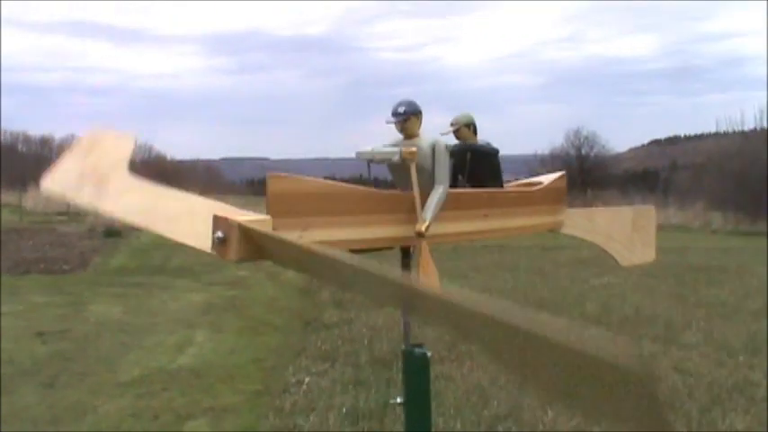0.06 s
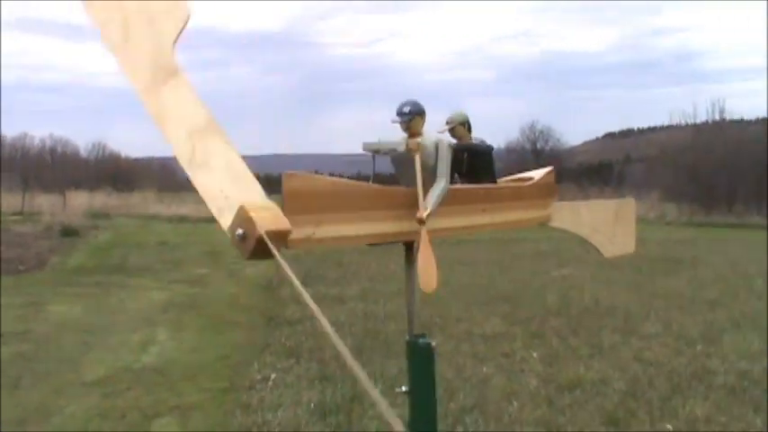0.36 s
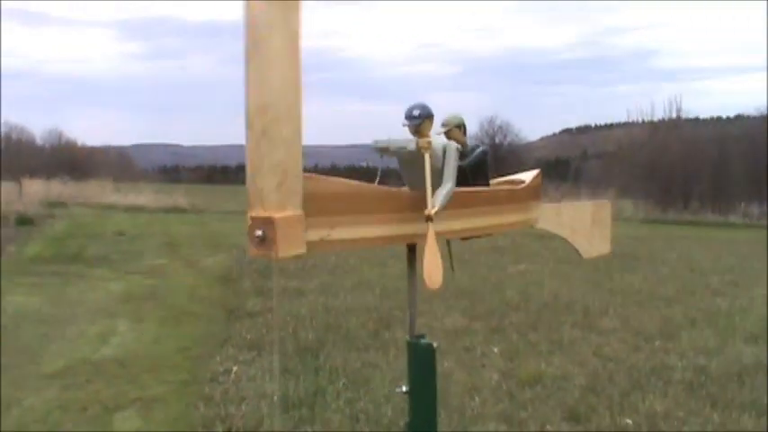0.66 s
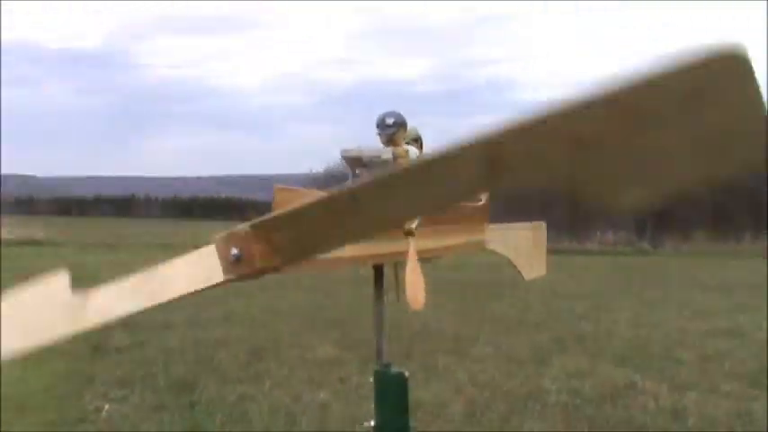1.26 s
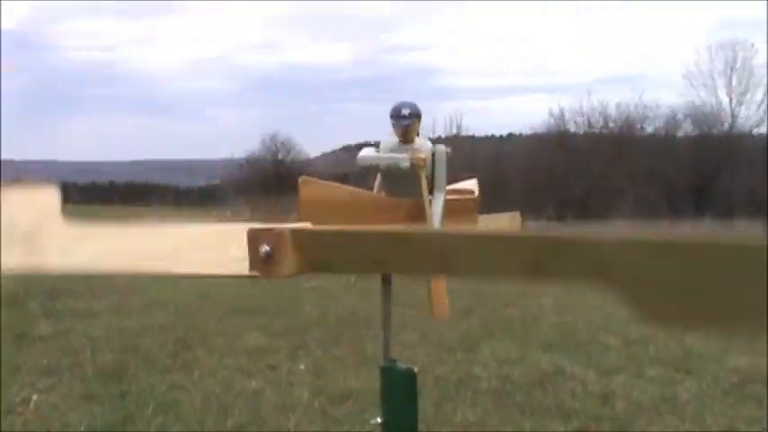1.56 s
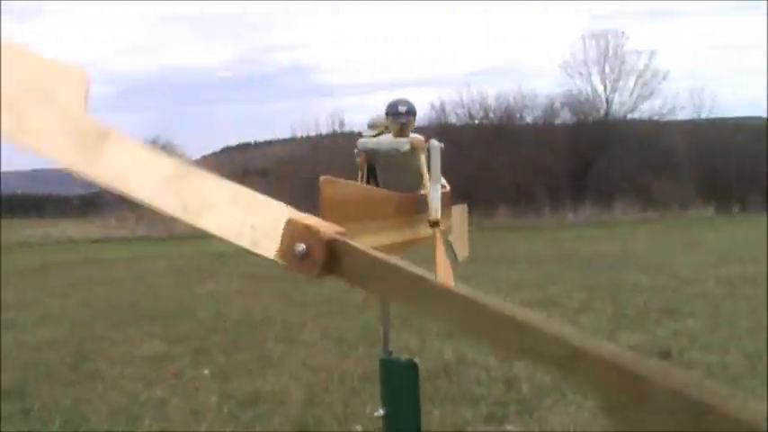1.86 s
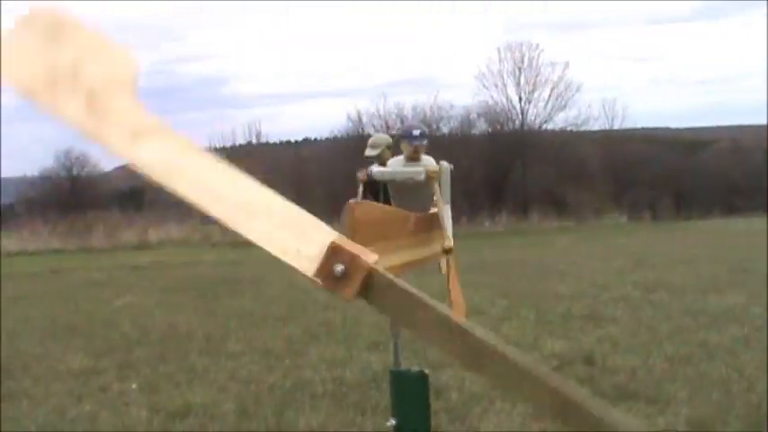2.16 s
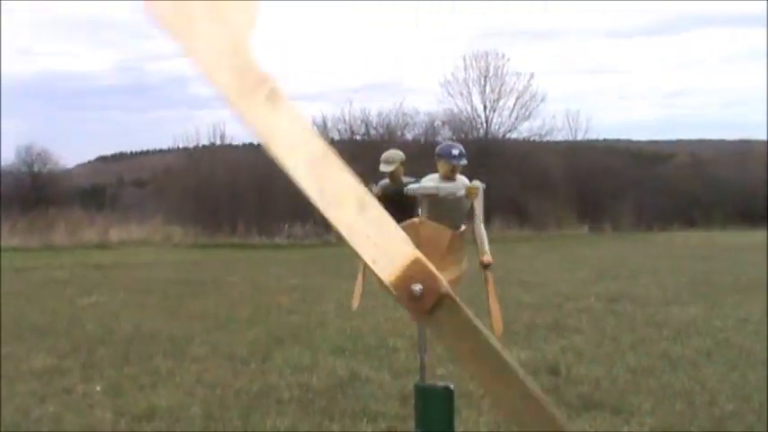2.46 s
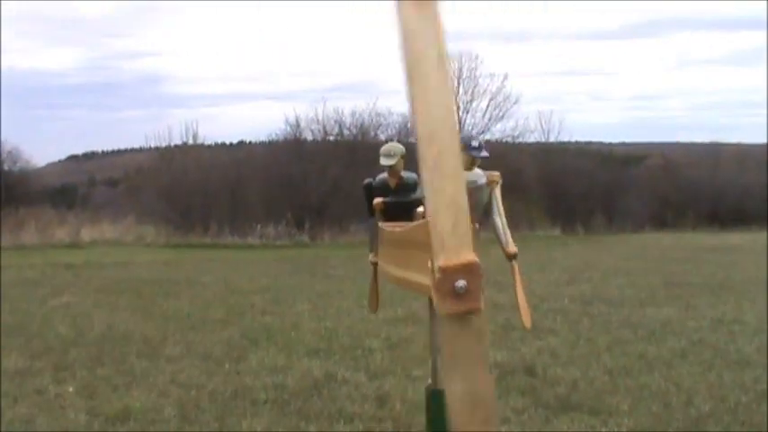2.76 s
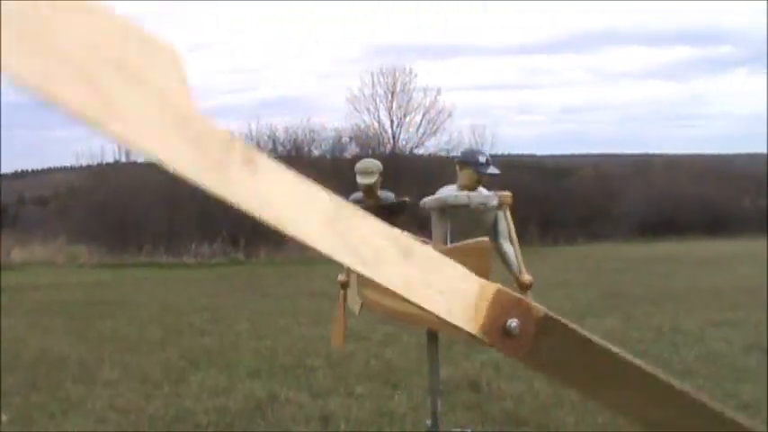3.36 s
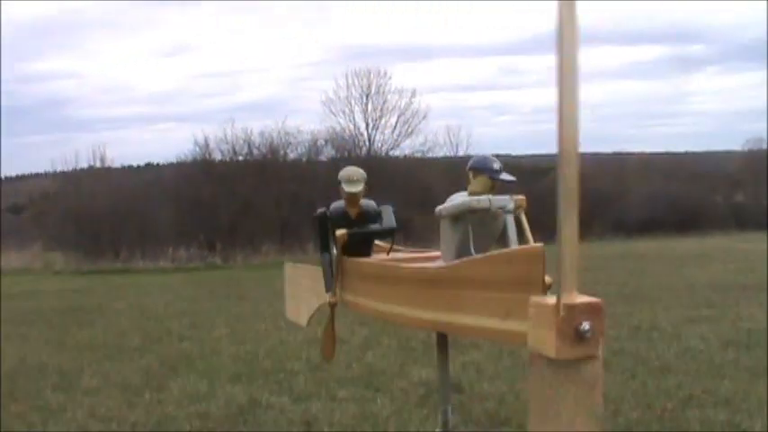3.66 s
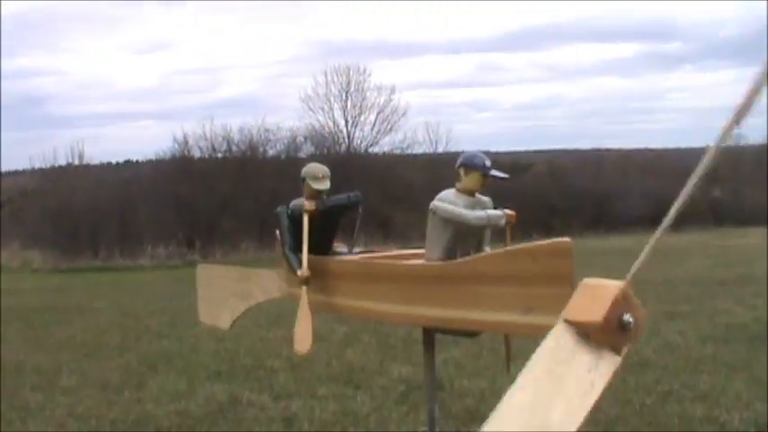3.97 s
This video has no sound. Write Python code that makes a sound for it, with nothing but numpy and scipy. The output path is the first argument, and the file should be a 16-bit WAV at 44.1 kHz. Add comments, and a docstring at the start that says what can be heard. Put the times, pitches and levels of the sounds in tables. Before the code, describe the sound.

Uneven wind gusts rumble on the microphone while a wooden whirligig faintly clatters and creaks.

```python
"""Uneven wind gusts buffet a camera microphone in an open field and die down after two seconds.
Their eddies rumble and flutter at its two ports; a few slaps of air thump.
Close by, a wooden whirligig turns: its crank sticks and slips once a turn, its dry joints click and
squeal, its loose linkage chatters and knocks on the hull. One sharp tick stands out from two faint ones.
Behind: a brief thin whistle, passing grass hiss, a low hum and quiet field air."""
import sys
import numpy as np
from scipy import signal
from scipy.fft import rfft, irfft, next_fast_len
from scipy.io import wavfile
from scipy.ndimage import map_coordinates

SR = 44100
rng = np.random.default_rng(int(sys.argv[2]) if len(sys.argv) > 2 else 0)


def wav_out(sig):
    """Save sig, one row per channel (or a flat mono array), as 16-bit PCM at SR to the path in sys.argv[1]."""
    wavfile.write(sys.argv[1], SR, np.round(np.clip(np.atleast_2d(sig).T, -1, 1) * 32767).astype(np.int16))


N = 176400

# gust envelope, before trim: time_s, rumble_db, flutter_db
GUSTS = [(0.0, -35.5, -53), (0.06, -56, -52), (0.11, -45, -44), (0.13, -40, -52), (0.24, -49, -58),
         (0.26, -39, -49), (0.32, -43.5, -48.5), (0.39, -55, -62.5), (0.47, -52, -41.5), (0.5, -48.5, -49),
         (0.58, -42, -49), (0.6, -42.5, -45.5), (0.66, -37, -46), (0.72, -49.5, -49.5), (0.81, -60.5, -66),
         (0.85, -40, -51.5), (0.87, -53, -55.5), (0.89, -60.5, -62), (0.93, -42.5, -58.5),
         (0.96, -53.5, -72), (0.99, -48.5, -57), (1.01, -53.5, -59), (1.03, -39, -51), (1.1, -51, -46.5),
         (1.12, -47, -42.5), (1.15, -55, -54.5), (1.16, -44, -44.5), (1.25, -45, -57), (1.27, -53, -64),
         (1.34, -50, -54.5), (1.36, -60, -63), (1.38, -44, -55), (1.41, -66, -63.5), (1.45, -46.5, -43.5),
         (1.58, -62, -76.5), (1.63, -49, -66), (1.65, -52, -51.5), (1.745, -39.5, -50), (1.82, -46, -55.5),
         (1.91, -44.5, -49.5), (1.95, -49.5, -56), (1.97, -39, -48.5), (2.0, -51, -73), (2.03, -46, -51.5),
         (2.11, -51.5, -66), (2.14, -43, -59), (2.2, -50.5, -62), (2.28, -56, -70.5), (2.35, -91, -96),
         (2.42, -70, -86), (2.67, -76, -86), (2.85, -61, -75), (2.92, -59, -75)]
# closing lull, before trim: time_s, rumble_db, flutter_db
LULL = [(3.0, -53, -58.5), (3.06, -57, -70.5), (3.12, -69, -81), (3.32, -68, -89), (3.358, -59.5, -78),
        (3.48, -67.5, -80.5), (3.68, -62.5, -75), (3.73, -73, -87), (4.0, -70, -86)]
# big-eddy spectrum: freq_hz, gain_db
RUMBLE_SPECTRUM = [(20, 0.5), (50, 0.5), (100, 1.5), (160, -4.5), (300, -29.5), (600, -46.5), (1500, -62),
                   (4000, -100)]
# small-eddy spectrum: freq_hz, gain_db
FLUTTER_SPECTRUM = [(40, -27), (120, -5), (210, -1.5), (400, -12), (700, -22.5), (1300, -32.5),
                    (3000, -51.5), (9000, -107)]
# flutter side-channel EQ: freq_hz, gain_db
FLUTTER_SIDE_EQ = [(100, 2.5), (200, 1), (400, 3.5), (800, 4), (1500, 4)]
# air slaps: start_s, level_db
THUMPS = [(1.794, -37.5), (2.138, -43), (2.962, -37), (2.976, -45), (3.032, -46.5)]
# modes of a slap: freq_hz, gain_db, t60_s
THUMP_MODES = [(153, 0, 0.063), (214, -11.5, 0.12), (303, 3.5, 0.029), (440, -18, 0.038),
               (830, -35, 0.0065)]

# crank rubs, one a turn: start_s, end_s, level_db, pitch_ratio, crest_fraction, treble_db
RUBS = [(0.47, 0.77, -59, 1.01, 0.35, -2.5), (1.246, 1.485, -59.5, 1.02, 0.57, 3.5),
        (1.969, 2.15, -60, 1.02, 0.33, 2), (2.571, 2.831, -62, 1.0, 0.54, 5.5),
        (3.457, 3.76, -63.5, 1, 0.62, 2.5)]
# crank catches: start_s, level_db
CATCHES = [(0.444, -53), (0.576, -55), (0.705, -57), (1.221, -61.5), (1.288, -58), (1.369, -59),
           (2.037, -57), (2.12, -58), (2.553, -62), (2.623, -58), (2.666, -57), (2.704, -52.5),
           (2.733, -61), (2.796, -62.5), (3.412, -56.5), (3.508, -59), (3.558, -66), (3.61, -57.5)]
# lower crank resonances: centre_hz, width_hz, gain_db
CRANK_BANDS = [(1647, 240, -3), (2170, 340, -6), (2433, 190, 4.5), (2706, 290, -2.5), (3240, 610, -18.5)]
# upper, rasping crank resonances: centre_hz, width_hz, gain_db
RASP_BANDS = [(3370, 1200, -2.5), (4414, 410, 3), (5174, 220, 1), (7580, 4000, -18.5)]
# linkage chatter: start_s, end_s, level_db
CHATTERS = [(0.04, 0.27, -62.5), (0.29, 0.33, -65), (0.45, 0.72, -72), (0.76, 1.0, -65.5),
            (1.53, 1.72, -65.5), (2.2, 2.38, -68.5), (2.85, 2.96, -66), (3.0, 3.07, -70.5),
            (3.87, 4.0, -66.5)]
# linkage knocks: start_s, level_db
KNOCKS = [(0.057, -51), (0.093, -65), (0.146, -51.5), (0.165, -49.5), (0.209, -47), (0.23, -46),
          (0.241, -49), (0.313, -52.5), (1.542, -58.5), (1.712, -55), (1.902, -55.5), (2.296, -57),
          (2.322, -56), (2.342, -58), (2.905, -58), (2.962, -66), (2.993, -58), (3.862, -54), (3.959, -57)]
# wooden hull resonances: centre_hz, width_hz, gain_db
HULL_BANDS = [(970, 980, 0), (1700, 108, 11), (2187, 390, 0), (2500, 390, -1), (2750, 250, -11),
              (4110, 950, -8.5), (5150, 300, -9), (6340, 500, -16.5), (7790, 610, -18), (9500, 2300, -22.5)]
# joint clicks, and two lower crank catches near 0.23 s played the same way: start_s, pitch_hz, level_db
CLICKS = [(0.166, 5370, -59), (0.229, 5300, -53), (0.233, 2230, -51), (0.241, 2200, -49),
          (1.542, 5550, -68), (1.626, 5270, -74), (1.648, 5550, -67), (1.671, 5400, -63.5),
          (1.71, 5260, -76), (1.753, 5200, -69.5), (1.966, 4150, -59), (2.34, 5360, -70),
          (2.866, 4200, -59), (2.903, 4300, -61)]
# joint squeals: start_s, end_s, pitch_hz, level_db
SQUEALS = [(0.778, 0.873, 4060, -71), (1.938, 1.973, 4400, -73), (2.857, 2.945, 4250, -77),
           (3.878, 3.953, 7930, -81)]
# soft frame rings: start_s, level_db
FRAME_RINGS = [(2.31, -70), (3.871, -62.5)]
# frame modes: freq_hz, gain_db, t60_s
FRAME_MODES = [(593, -1.5, 0.42), (890, -2, 1), (1101, -7, 0.34), (1430, -9, 0.37)]

# sharp ticks: start_s, level_db
TICKS = [(0.146, -52.5), (0.9672, -34.5), (3.658, -58)]
# modes of a tick: freq_hz, gain_db, t60_s
TICK_MODES = [(4980, -6.5, 0.0055), (7100, -4.5, 0.0057), (8450, 1.5, 0.0015)]
# grass hiss envelope: time_s, level_db
GRASS_LEVEL = [(0.0, -77.5), (0.22, -75), (0.28, -81.5), (0.45, -76), (0.55, -79), (0.61, -73), (0.76, -71),
               (1.07, -69.5), (1.13, -83), (1.9, -86), (2.02, -75.5), (2.33, -79), (2.41, -82.5),
               (4.0, -85)]
# grass hiss spectrum: freq_hz, gain_db
GRASS_SPECTRUM = [(800, -2), (2500, 12), (4200, 7), (5800, 4.5), (7200, 9.5), (10000, 4), (13000, 0),
                  (16000, -4.5)]
# low drone spectrum: freq_hz, gain_db
DRONE_SPECTRUM = [(20, 9.5), (60, 1.5), (100, -8), (125, 3.5), (160, -6), (260, -30.5), (600, -62)]
# field air spectrum: freq_hz, gain_db
AIR_SPECTRUM = [(110, -13), (180, 1.5), (298, -8), (541, -2), (628, -5.5), (928, -1), (1040, -3),
                (1620, -4), (1920, -6.5), (2950, -10), (5990, -28.5), (7220, -34.5), (15500, -38.5)]
# air side-channel EQ: freq_hz, gain_db
AIR_SIDE_EQ = [(200, -34), (1000, -12.5), (3000, -15), (12000, -11)]

SLIP_ATTACK_S = 0.0012


def wind(rumble_trim_db=1, flutter_trim_db=4):
    """Big eddies push both microphone ports together; small ones push them against each other."""
    time_s, *levels_db = np.transpose([*GUSTS, *LULL])
    rumble_db, flutter_db = (np.interp(clock(), time_s, db) for db in levels_db)
    rumble = spread(noise(RUMBLE_SPECTRUM), side_db=-9, pan_db=1.8)
    mid, side = noise(FLUTTER_SPECTRUM) * amp(wobble(90))
    flutter = spread([mid, filtered(side, colour(FLUTTER_SIDE_EQ))], side_db=1.5, pan_db=0.4)
    return amp(rumble_db + rumble_trim_db) * rumble + amp(flutter_db + flutter_trim_db) * flutter


def thumps(port_lag_s=0.0011):
    """Slaps of air reach the left port just before the right."""
    return np.array([rings(THUMPS, THUMP_MODES, lag_s) for lag_s in (0, port_lag_s)])


def whirligig():
    """Crank, linkage, joints and frame of the turning wooden toy."""
    wood = crank() + linkage() + joint_clicks()
    return spread(wood, side_db=-18, pan_db=-0.5) + joint_squeals() + rings(FRAME_RINGS, FRAME_MODES)


def crank(sag_per_s=0.35, wander_ratio=0.025, rub_rasp_db=-14, catch_rasp_db=-2):
    """Stick-slip rubs swell and fade as the lower resonances sag; catches rasp harder and brighter."""
    t, level, treble, pitch = clock(), np.zeros(N), np.zeros(N), np.ones(N)
    for start_s, end_s, db, ratio, crest, treble_db in RUBS:
        crest_s = start_s + crest * (end_s - start_s)
        stroke = amp(db) * np.interp(t, [start_s, crest_s, end_s], [0, 1, 0]) ** 0.53  # rounded flanks
        level += stroke
        treble += amp(treble_db) * stroke
        rubbing = (t > start_s) & (t < end_s)
        pitch[rubbing] = ratio - sag_per_s * (t[rubbing] - (start_s + end_s) / 2)
    read_index = np.cumsum(pitch + wander_ratio * wobble(25))  # resampling bends the resonances
    low = np.array([map_coordinates(x, [read_index], mode="mirror") for x in band_noise(CRANK_BANDS)])
    rasp = band_noise(RASP_BANDS)
    grain = slips(rate_hz=140, t60_s=0.054, scatter_db=2.5)
    catch = strikes(CATCHES, t60_s=0.042, attack_s=SLIP_ATTACK_S)
    low_level = np.hypot(level * grain, catch)
    rasp_level = np.hypot(amp(rub_rasp_db) * treble * grain, amp(catch_rasp_db) * catch)
    return low_level * low + rasp_level * rasp


def slips(rate_hz, t60_s, scatter_db):
    """Envelope of wood sticking and slipping unevenly; the slips add in power."""
    gaps, sizes = rng.uniform(0.3, 1.7, 4000), rng.standard_normal(4000)
    onsets = (np.cumsum(gaps) / rate_hz * SR).astype(int)
    powers = np.bincount(onsets, amp(scatter_db * np.clip(sizes, -2, 2)) ** 2, N)[:N]
    slip = strikes([(0, 0)], t60_s, SLIP_ATTACK_S)
    return unit(np.sqrt(np.abs(signal.fftconvolve(powers, slip ** 2)[:N])))


def linkage():
    """The loose linkage chatters and knocks, exciting the hull."""
    chatter = swells(CHATTERS, edge_s=0.065) * slips(rate_hz=100, t60_s=0.057, scatter_db=3)
    knocks = strikes(KNOCKS, t60_s=0.04, attack_s=0.0005)
    return np.hypot(knocks, chatter) * band_noise(HULL_BANDS)


def joint_clicks(t60_s=0.047, width_hz=660):
    """Each click or catch rings at its own pitch over a thin, high crackle."""
    crackle = (7540, 5100, -21)  # centre_hz, width_hz, gain_db
    return sum(strikes([(start_s, db)], t60_s, SLIP_ATTACK_S) * band_noise([(hz, width_hz, 0), crackle])
               for start_s, hz, db in CLICKS)


def joint_squeals(width_hz=950, grit_db=6):
    """Dry joints squeal in narrow, gritty noise bands."""
    notes = np.zeros(N)
    for start_s, end_s, hz, db in SQUEALS:
        phase = 2 * np.pi * hz * clock()
        band = wobble(width_hz) * np.sin(phase) + wobble(width_hz) * np.cos(phase)
        notes += swells([(start_s, end_s, db)], edge_s=0.026) * band
    return notes * unit(amp(grit_db * np.tanh(wobble(90))))


def ticks():
    """Tiny hard contacts near the microphone, a little to the right."""
    return rings(TICKS, TICK_MODES) * amp([[-4], [2.5]])


def whistle(start_s=3.1, length_s=0.08, pitch_hz=7250, rise_hz=1440, peak_db=-83):
    """A faint, thin note curving upward."""
    progress = np.clip((clock() - start_s) / length_s, 0, 1)
    hz = pitch_hz + rise_hz * progress ** 2 + 40 * wobble(300)
    arch = np.sqrt(np.abs(np.sin(np.pi * progress)))
    return amp(peak_db) * arch * np.sin(2 * np.pi * np.cumsum(hz) / SR)


def grass():
    """Passing swells of hiss from the grass."""
    level_db = np.interp(clock(), *np.transpose(GRASS_LEVEL))
    return amp(level_db) * spread(noise(GRASS_SPECTRUM), side_db=-9, pan_db=0.5)


def hum(pitch_hz=118.3, tone_db=-70, drone_db=-66):
    """A slightly unsteady tone in a low noise drone."""
    phase = 2 * np.pi * pitch_hz * clock() + 0.4 * wobble(24)
    tone = amp(tone_db + 2 * wobble(14)) * unit(np.sin(phase))
    drone = amp(drone_db) * spread(noise(DRONE_SPECTRUM), side_db=-6, pan_db=-6.5)
    return (tone + drone) * amp([[1.2], [-1.2]])


def field_air(gain_db=-64.5):
    """Steady, quiet noise of the open field."""
    mid, side = noise(AIR_SPECTRUM)
    return amp(gain_db) * spread([mid, filtered(side, colour(AIR_SIDE_EQ))], side_db=5.5, pan_db=2)


def amp(db):
    """Decibels to gain."""
    return 10 ** (np.asarray(db) / 20)


def unit(x):
    """Scale to rms 1."""
    return x / np.sqrt(np.mean(x ** 2) + 1e-20)


def clock():
    """Seconds at each sample."""
    return np.arange(N) / SR


def colour(points):
    """Response through (freq_hz, gain_db) points on a log axis."""
    freq_hz, db = np.transpose(points)
    return lambda hz: amp(np.interp(np.log(hz + 1), np.log(freq_hz + 1), db))


def filtered(x, response):
    """Zero-phase FFT filter."""
    size = next_fast_len(N + SR // 2)
    return irfft(rfft(x, size) * response(np.fft.rfftfreq(size, 1 / SR)), size)[..., :N]


def wobble(rate_hz):
    """Smooth random curve with knots at rate_hz."""
    return map_coordinates(rng.standard_normal(4096), [clock() * rate_hz], mode="mirror")


def noise(spectrum):
    """Two independent noises of one colour."""
    return unit(filtered(rng.standard_normal((2, N)), colour(spectrum)))


def band_noise(bands):
    """Two independent noises through a set of resonances."""
    def response(hz):
        return sum(amp(db) / (1 + (2 * (hz - centre_hz) / width_hz) ** 2)
                   for centre_hz, width_hz, db in bands)
    return unit(filtered(rng.standard_normal((2, N)), response))


def spread(pair, side_db, pan_db):
    """Mid/side to left/right; positive pan is left."""
    mid, side = pair[0], amp(side_db) * pair[1]
    left, right = (mid + side) * amp(pan_db / 2), (mid - side) * amp(-pan_db / 2)
    return np.array([left, right]) / np.hypot(1, amp(side_db))


def swells(rows, edge_s):
    """Rise, hold and fall for each row."""
    t = clock()
    return sum(amp(db) * np.clip(np.minimum(t - start_s, end_s - t) / edge_s + 0.5, 0, 1)
               for start_s, end_s, db in rows)


def strikes(blows, t60_s, attack_s):
    """Envelope of blows: fast attack, exponential decay."""
    ages = [(np.maximum(clock() - start_s, 0), db) for start_s, db in blows]
    return sum(amp(db - 60 * t / t60_s) * (1 - np.exp(-t / attack_s)) for t, db in ages)


def rings(blows, modes, lag_s=0):
    """Damped sines from each blow."""
    ages = [(np.maximum(clock() - start_s - lag_s, 0), db) for start_s, db in blows]
    return sum(amp(db + mode_db - 60 * t / t60_s) * np.sin(2 * np.pi * hz * t)
               for t, db in ages for hz, mode_db, t60_s in modes)


def scene():
    """All sources in the open air."""
    return wind() + thumps() + whirligig() + ticks() + whistle() + grass() + hum() + field_air()


def record(dry, cutoff_hz=15750):
    """The camera keeps nothing above its band limit."""
    return filtered(dry, lambda hz: hz < cutoff_hz)


dry = scene()
out = record(dry)
wav_out(out)
```